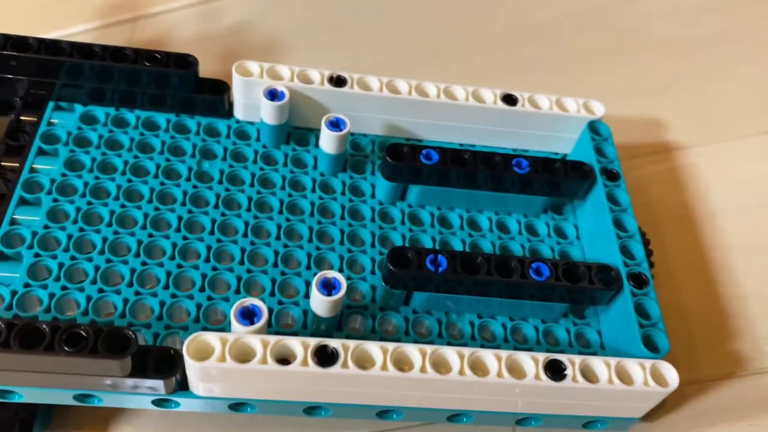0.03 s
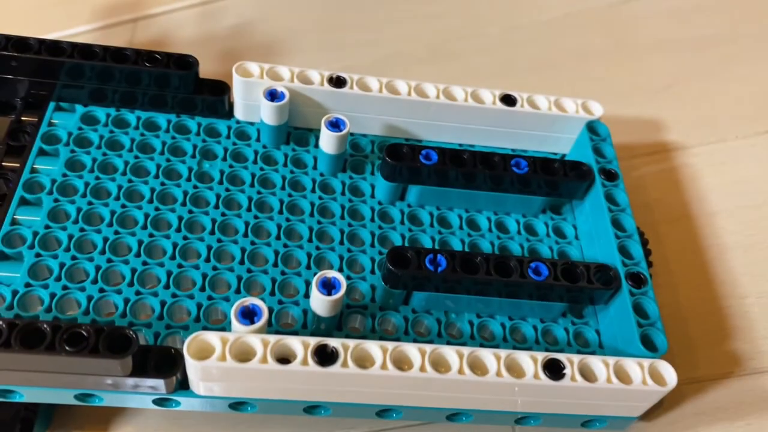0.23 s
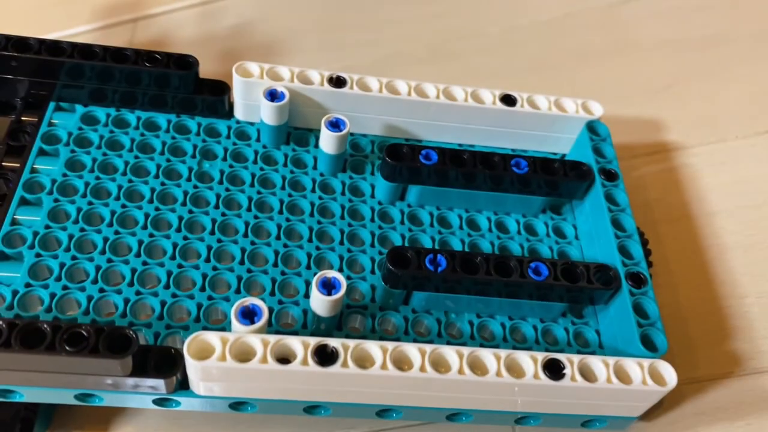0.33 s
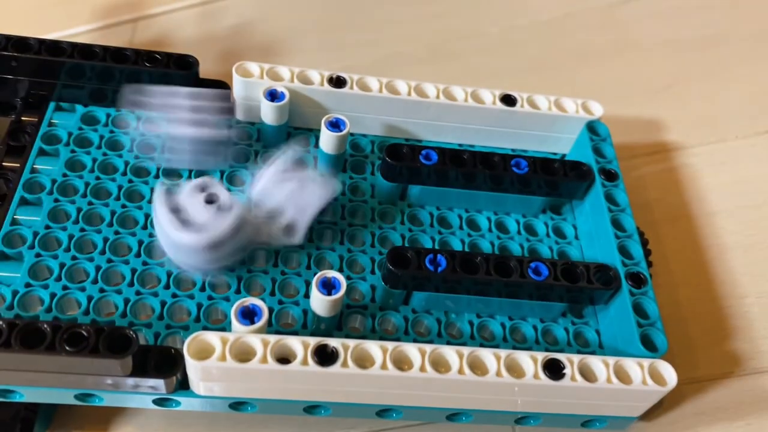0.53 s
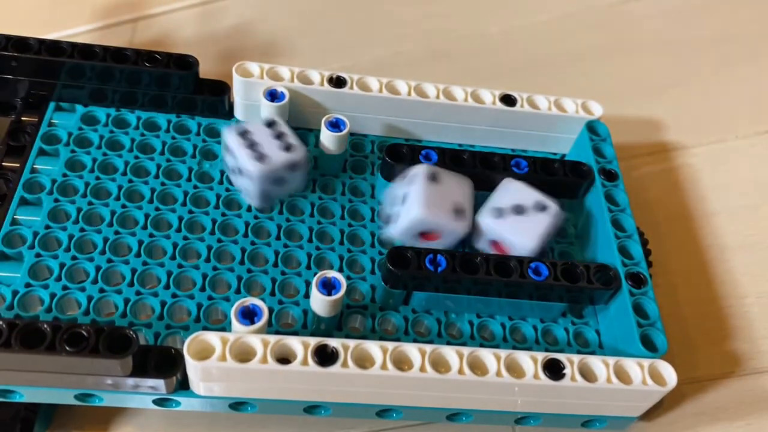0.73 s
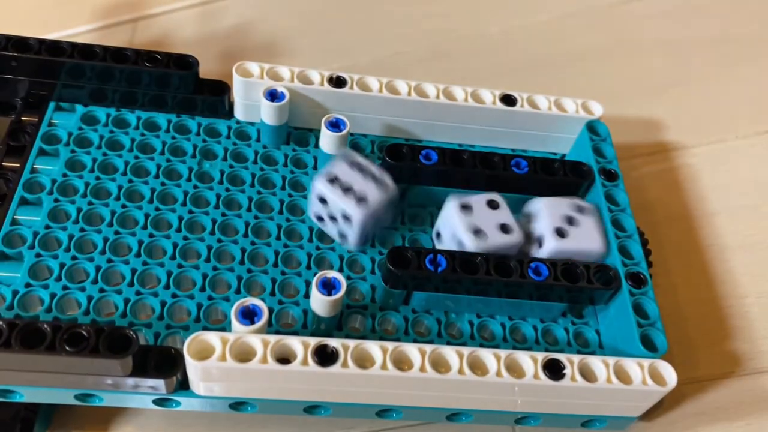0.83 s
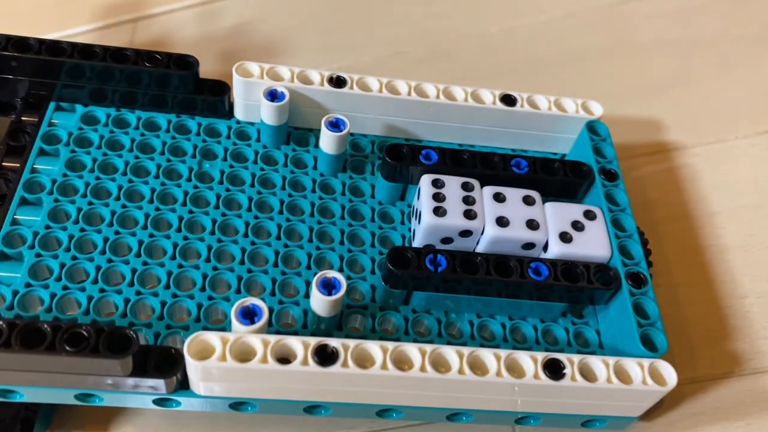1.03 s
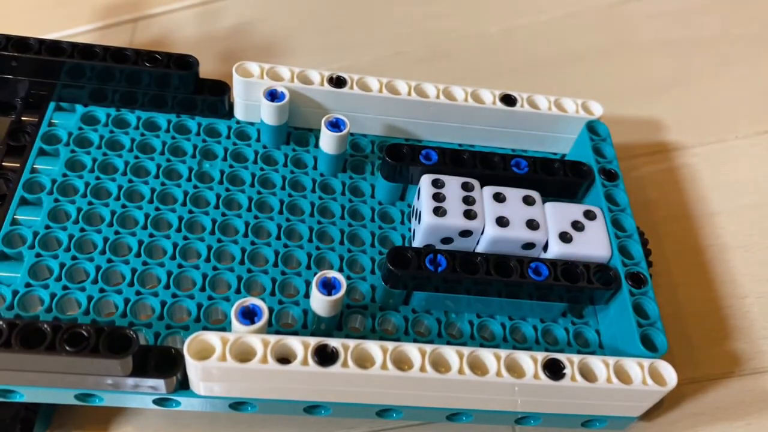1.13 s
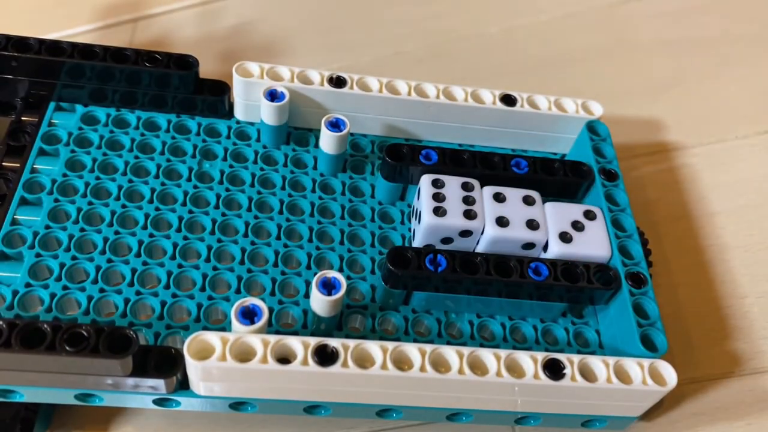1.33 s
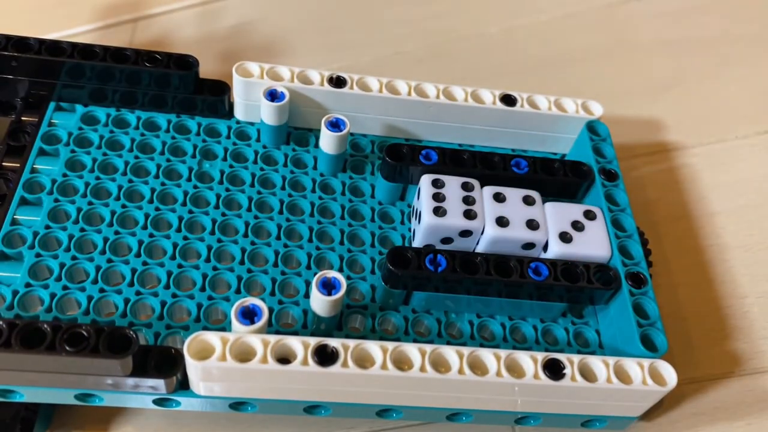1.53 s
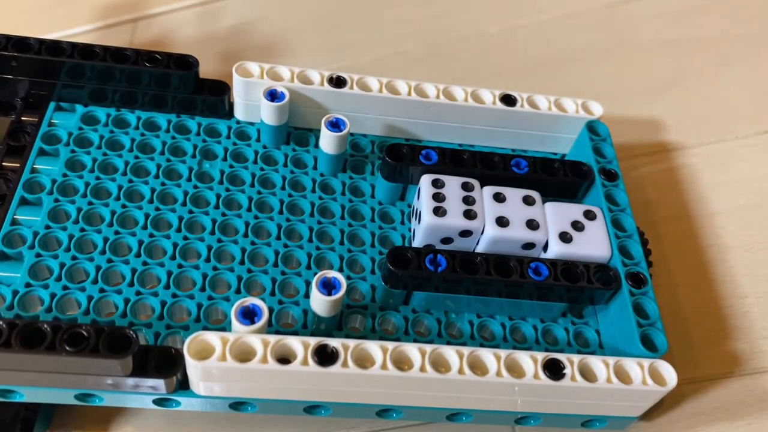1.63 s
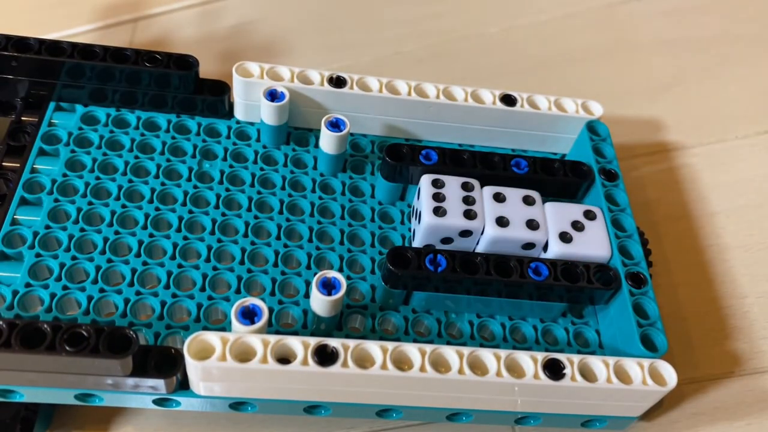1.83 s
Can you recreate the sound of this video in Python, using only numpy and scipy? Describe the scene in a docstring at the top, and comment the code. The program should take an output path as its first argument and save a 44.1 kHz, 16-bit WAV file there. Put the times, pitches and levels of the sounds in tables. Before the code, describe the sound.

Three hard plastic dice clatter down a studded toy brick tray, clicking against each other, knocking into rails at the end and quickly rattling to rest. The microphone is close, in a quiet room.

```python
"""A quiet room with a faint hum, one microphone close to a studded toy brick tray.
Three hard plastic dice rub together, tumble down the tray, hit the rails at its end and rattle to rest
in the slot between them. Each blow is a short dense clack with a local ring; die on die gives a tick.
Small rolling contacts fill the gaps, the whole tray rings low, and the room answers."""
import sys
import numpy as np
from scipy import signal
from scipy.fft import rfft, irfft, next_fast_len
from scipy.io import wavfile

SR = 44100
rng = np.random.default_rng(int(sys.argv[2]) if len(sys.argv) > 2 else 0)


def wav_record(signal):
    """Record a signal, one row per channel, as 16-bit PCM in the file named by sys.argv[1]."""
    frames = np.transpose(np.atleast_2d(signal))
    bounded = np.clip(frames, -1, 1)
    # unit amplitude maps onto the largest positive 16-bit level
    quanta = np.round(bounded * 32767).astype(np.int16)
    wavfile.write(sys.argv[1], SR, quanta)


N = 83790
T = np.arange(SR // 6) / SR  # seconds within one blow

# Modes of the tray's mouth and of its studded plate. Each row: pitch in Hz, level in dB, T60 in seconds.
MOUTH_MODES = [(783, -1, 0.04), (1950, 1.5, 0.032), (2570, -8, 0.055), (3190, -9, .04), (3730, -5.5, 0.059)]
PLATE_MODES = [(1720, -8, 0.034), (1947, -3.5, .03), (2397, 0, 0.046), (2955, 3.5, 0.038),
               (3825, -1, 0.041), (5320, -4.5, 0.04), (6400, -4.5, .03), (8650, -7.5, 0.03)]
MOUTH_DB, PLATE_DB = -4, -6.5  # weight of these modes within a clack


def amp(db):
    """Decibels to amplitude."""
    return 10 ** (np.asarray(db) / 20)


def norm(x):
    """Scale to unit energy."""
    return x / np.sqrt(np.sum(x ** 2) + 1e-20)


def along(points, hz):
    """Interpolate (Hz, value) points on a log frequency axis."""
    freqs, values = np.transpose(points)
    return np.interp(np.log(hz + 1), np.log(freqs + 1), values)


def filtered(x, gain):
    """Apply a gain that depends on frequency."""
    size = next_fast_len(len(x) + 2048)
    return irfft(rfft(x, size) * gain(np.fft.rfftfreq(size, 1 / SR)), size)[:len(x)]


def lean(hz, tilt):
    """Treble slope in dB, at tilt dB per octave: a harder contact is brighter."""
    return tilt * np.log2(np.maximum(hz, 1500) / 4000)


def noise(colour, size, tilt=0):
    """Coloured noise of rms 1."""
    coloured = filtered(rng.standard_normal(size), lambda hz: amp(along(colour, hz) + lean(hz, tilt)))
    return norm(coloured) * np.sqrt(size)


def fade(t60, rise_s=0.0001):
    """Quick attack, exponential decay."""
    return np.exp(-np.log(1000) * T / t60) * (1 - np.exp(-T / rise_s))


def add(out, s, x):
    """Mix x in at s seconds."""
    part = out[max(0, round(s * SR)):][:len(x)]
    part += x[:len(part)]


def room_tone():
    """Low room noise and a faint appliance hum."""
    # Spectrum of the still room. Each row: frequency in Hz, relative density in dB.
    air_colour = [(20, 1), (35, -10.5), (62, -10.5), (110, -17), (170, -25), (600, -33.5), (1100, -40.5),
                  (3000, -51.5), (16000, -63)]
    # The appliance's tone. Each row: pitch in Hz, rms level in dB.
    hum_tones = [(662.1, -90)]
    t = np.arange(N) / SR
    hum = sum(amp(db) * np.sqrt(2) * np.sin(2 * np.pi * (hz * t + rng.random())) for hz, db in hum_tones)
    return amp(-60.5) * noise(air_colour, N) + hum


def room_answer(x):
    """Near surfaces answer first; then the energy in each band scatters into a dying diffuse tail."""
    # Reverberation time. Each row: frequency in Hz, T60 in seconds.
    room_t60 = [(200, 0.3), (1000, 0.61), (5200, 0.49), (10000, 0.41), (15000, .27)]
    hz, t, spectrum = signal.stft(x, SR, nperseg=192)
    decay = amp(-60 * t / along(room_t60, hz)[:, None]) ** 2
    decay /= decay.sum(1, keepdims=True)
    energy = np.abs(signal.fftconvolve(np.abs(spectrum) ** 2, decay, axes=1))[:, :len(t)]
    scatter = signal.stft(rng.standard_normal(N), SR, nperseg=192)[2]
    wall_gain = amp(-19 + lean(hz, tilt=-1))[:, None]  # hard walls keep most of the treble
    tail = signal.istft(wall_gain * np.sqrt(energy) * scatter / scatter.std(), SR, nperseg=192)[1][:N]
    near_surfaces = norm(rng.standard_normal(len(T)) * fade(t60=0.024))
    add(tail, 0.004, amp(-17) * signal.fftconvolve(x, near_surfaces))
    return tail


def rumble():
    """The tray shudders on the floor while the dice move."""
    # Course of the shudder. Each row: time in seconds, level in dB.
    levels = [(0, -55), (.45, -54.5), (.9, -61.5), (1.02, -81)]
    # Its dull spectrum. Each row: frequency in Hz, relative density in dB.
    colour = [(20, -9), (75, 1), (130, -11), (220, -4.5), (450, -19), (1500, -29.5), (16000, -46.5)]
    return amp(np.interp(np.arange(N) / SR, *np.transpose(levels))) * noise(colour, N)


def scuffs():
    """The dice rub together before they drop: short soft swells of noise."""
    # The rubs. Each row: start in seconds, level in dB.
    rubs = [(0.057, -52), (0.093, -53), (0.104, -51), (0.153, -46)]
    # Spectrum of a rub. Each row: frequency in Hz, relative density in dB.
    colour = [(500, -25), (2000, -3), (3500, 9), (7000, -1.5), (11000, -3.5), (16000, -10)]
    out, rise_s = np.zeros(N), 0.0037
    swell = T / rise_s * np.exp(1 - T / rise_s)
    for s, db in rubs:
        add(out, s, amp(db) * swell * noise(colour, len(T)))
    return out


def thuds():
    """A panel flexes under the weight of a landing die."""
    # Heavy landings. Each row: start in seconds, pitch in Hz, peak in dB.
    landings = [(.161, 777, -38.5), (.207, 747, -37.5), (.363, 352, -37), (.475, 230, -40.5),
                (.525, 376, -39.5), (.715, 677, -42), (.742, 373, -49), (.771, 710, -39.5)]
    out = np.zeros(N)
    for s, hz, db in landings:
        add(out, s, amp(db) * fade(t60=0.088) * np.sin(2 * np.pi * hz * T))
    return out


def ring(modes, tilt=0, detune=0):
    """Damped modes, excited a little differently by each blow."""
    out = np.zeros(len(T))
    for hz, db, t60 in modes:
        strength = amp(db + lean(hz, tilt) + rng.normal(0, 2.8))
        pitch = hz * (1 + detune * rng.normal())
        out += strength * fade(t60) * np.sin(2 * np.pi * (pitch * T + rng.random()))
    return norm(out)


def clack(modes, modes_db, tilt, tray_db):
    """One contact: a crowd of short plastic modes, the struck part's own modes and the tray's low ring."""
    # Spectrum of struck plastic. Each row: frequency in Hz, relative density in dB.
    colour = [(100, -28.5), (480, -11), (1100, -7.5), (2000, -2), (4500, -3), (6500, -5), (9000, -11.5),
              (12000, -17), (16000, -29)]
    # Low modes of the whole tray. Each row: pitch in Hz, level in dB, T60 in seconds.
    tray_modes = [(238, -16, 0.11), (358, -8.5, 0.12), (665, -2, 0.06), (731, -5, .07), (855.2, 0, 0.09),
                  (965, -2, .04)]
    spot_db = 3 * rng.standard_normal(256)  # peaks and dips that differ from spot to spot
    spot_hz = 260 * np.arange(len(spot_db))
    dense = filtered(noise(colour, len(T), tilt), lambda hz: amp(np.interp(hz, spot_hz, spot_db)))
    body = filtered(dense, lambda hz: 1 / (1 + (hz / 7046) ** 4))
    treble = dense - body  # the plastic damps this sooner
    spread_s = 0.0012  # the blow spreads through the joined bricks
    crowd = norm(body * fade(0.025, spread_s) + treble * fade(0.018, spread_s))
    part_ring = ring(modes, tilt)
    tray_ring = ring(tray_modes, detune=0.018)  # loose joints and the moving load shift the modes
    return amp(-2) * crowd + amp(modes_db) * part_ring + amp(tray_db) * tray_ring


def rolling():
    """The dice jostle, rustle through the mouth, patter over the studs, then chatter in the slot."""
    # Course of the small contacts. Each row: time in seconds, level in dB.
    course = [(0, -51.5), (.14, -55), (.165, -43), (.198, -49.5), (.225, -40), (.28, -42), (.325, -47.5),
              (.35, -40), (0.439, -42), (.56, -41.5), (.69, -43.5), (.75, -41), (.86, -41.5), (.905, -41.5),
              (.925, -52.5)]
    # Modes of the slot between the rails. Each row: pitch in Hz, level in dB, T60 in seconds.
    slot_modes = [(2638, -8.5, 0.038), (3644, -5.5, 0.031), (4880, 0, .06), (5320, -2, 0.025)]
    contacts_per_s, scatter_db = 450, 5.5
    arrivals_s = [0.2, 0.34, 0.79]  # at the mouth, the plate and the slot
    stages = [dict(modes=MOUTH_MODES, modes_db=-10, tilt=-5, tray_db=-10),  # before the drop
              dict(modes=MOUTH_MODES, modes_db=MOUTH_DB, tilt=-4.5, tray_db=-11),
              dict(modes=PLATE_MODES, modes_db=PLATE_DB, tilt=-4.5, tray_db=-4.5),
              dict(modes=slot_modes, modes_db=2.5, tilt=-4.5, tray_db=-4.5)]
    contacts = [[norm(clack(**stage)) for _ in range(16)] for stage in stages]
    times, levels = np.transpose(course)
    out = np.zeros(N)
    for k, (late, pick, force, side) in enumerate(rng.random((int(times[-1] * contacts_per_s), 4))):
        s = (k + late) / contacts_per_s
        choices = contacts[np.searchsorted(arrivals_s, s)]
        contact = np.sign(side - 0.5) * choices[int(pick * len(choices))]
        db = np.interp(s, times, levels) + scatter_db * (-np.log(1 - force) / 2 - 1)  # a few stand out
        add(out, s, amp(db) * np.sqrt(SR / contacts_per_s) * contact)
    return out


def ticks():
    """Dice meet each other with a dry, bright tick."""
    # Die against die. Each row: start in seconds, peak in dB.
    collisions = [(.452, -20), (0.513, -19), (0.5439, -18.5), (0.661, -26), (0.7145, -22.5),
                  (0.7706, -34.5), (0.8101, -25), (0.8321, -31), (0.8446, -20.5), (0.8734, -32.5)]
    # Spectrum of a tick. Each row: frequency in Hz, relative density in dB.
    colour = [(500, -17.5), (2000, -5), (4500, 9), (8000, 4), (12000, -9.5), (16000, -14)]
    out = np.zeros(N)
    for s, db in collisions:
        tick = noise(colour, len(T)) * fade(t60=0.01)
        add(out, s, amp(db) * tick / np.abs(tick).max())
    return out


def blows(hits, modes, modes_db, tray_db):
    """The dice land on one part of the tray; each spot adds its own ring."""
    out, blow_s = np.zeros(N), 0.0074  # a blow carries the energy of its level held this long
    for s, db, tilt, hz, ring_db in hits:
        blow = clack(modes, modes_db, tilt, tray_db) + amp(ring_db) * ring([(hz, 0, 0.03)])
        add(out, s, amp(db) * np.sqrt(blow_s * SR) * norm(blow))
    return out


def tumble():
    """The dice strike the tray's mouth, bounce down the studded plate and hit the rails and the slot."""
    # Blows on each part. Each row: start in seconds, level in dB, brightness in dB per octave,
    # ring of the struck spot in Hz, weight of that ring in dB.
    mouth_hits = [(0.161, -38.5, -7, 2900, -2.5), (0.2128, -38, -2.5, 3100, -3.5),
                  (0.2385, -39.5, 3.5, 5320, 1.5), (0.2555, -42, -4.5, 2000, 1),
                  (0.3005, -40.5, -0.5, 4090, 2)]
    plate_hits = [(0.3395, -35.5, -2, 2045, -8), (0.364, -27, -0.1, 4450, -7),
                  (0.378, -38.5, -4.5, 2909, -9.5), (0.4035, -37.5, -2.5, 4800, -7.5),
                  (0.4175, -38.5, 6, 4705, -10), (0.4228, -29, 2.35, 5880.0, -6),
                  (0.4275, -33.5, 0.7, 3750.0, -7.5), (0.434, -36.5, -1.5, 3500.0, -2.5),
                  (0.4585, -34.5, -4.5, 3703, -8.5), (0.4705, -29, 4, 4440, -5.5),
                  (0.4765, -32, 0, 3740.0, -4), (0.4842, -34.5, 4.5, 4530.0, -8),
                  (0.499, -40.5, 1, 3715, -1.5), (0.518, -28, 6.5, 4405, 2.5), (0.524, -24.5, 2, 4348, 0.5),
                  (0.5442, -28, 0, 4783, -7), (0.555, -39.5, -3, 4760, -4.5),
                  (0.5775, -29.5, -0.5, 4650, 0)]
    rail_hits = [(0.6112, -20, 2.5, 2646, -6), (0.6148, -29, -1.5, 5300, 4), (0.6364, -45, -4, 4660, 5),
                 (0.6525, -25.5, 0.5, 4820, 3.5), (0.6914, -45, -2, 4670, 2.5),
                 (0.6607, -33.5, 0.5, 4060, -8), (0.678, -40, -15.5, 4700, -10),
                 (0.7143, -30.5, -0.9, 3490, -8.5), (0.719, -34, 0.5, 3570, 5.5),
                 (0.7255, -36, -0.5, 4940, 6), (0.7325, -26, -0.5, 4806, 4),
                 (0.7415, -28.5, 1.96, 4803, -1.5), (0.7605, -39, 2.3, 4870, 3),
                 (0.7705, -34, 0, 4950, -7.5), (0.7775, -37, -1.5, 4600, 5), (0.7975, -38.5, -2, 3700, -7),
                 (0.8105, -35, 5.5, 5320, -6.5), (0.8165, -38.5, 0.5, 4690, 2),
                 (0.8408, -36, 0.5, 4926, 0.5), (0.88, -39, -0.5, 4850, 5), (0.892, -37.5, -2, 4750, -2),
                 (0.9025, -40.5, 0.4, 4870, 0)]
    # Modes of the rails. Each row: pitch in Hz, level in dB, T60 in seconds.
    rail_modes = [(1740, -9, 0.015), (2613, 3, 0.026), (3014, -1, 0.017), (3560, 5, .016), (5226, 0, .031),
                  (6330, -2.5, 0.022), (7400, -4, 0.019), (8440, -2, .018), (11620, -8.5, 0.016)]
    return (blows(mouth_hits, MOUTH_MODES, MOUTH_DB, tray_db=-22)
            + blows(plate_hits, PLATE_MODES, PLATE_DB, tray_db=-22)
            + blows(rail_hits, rail_modes, modes_db=-3.5, tray_db=-25))


def scene():
    """Dice and tray up close, the room behind them, in mono."""
    background = room_tone() + rumble()
    dice = tumble() + scuffs() + ticks() + thuds() + rolling()
    return (background + dice + room_answer(dice))[None]


def record(dry):
    """The sound has no treble above 15.9 kHz."""
    return np.array([filtered(x, lambda hz: hz < 15900) for x in dry])


dry = scene()
out = record(dry)
wav_record(out)
```